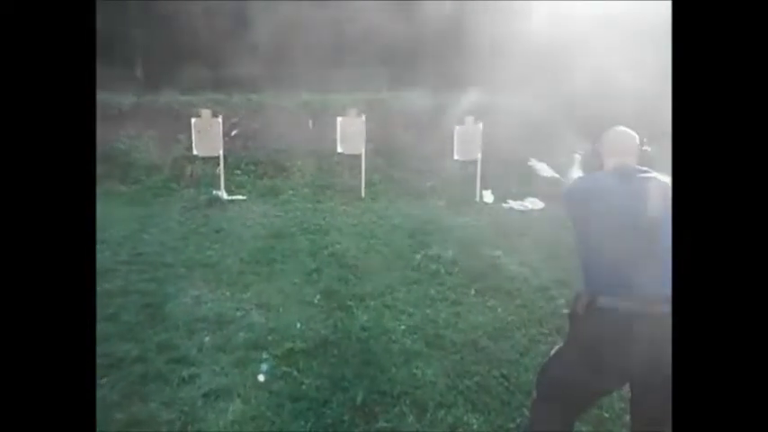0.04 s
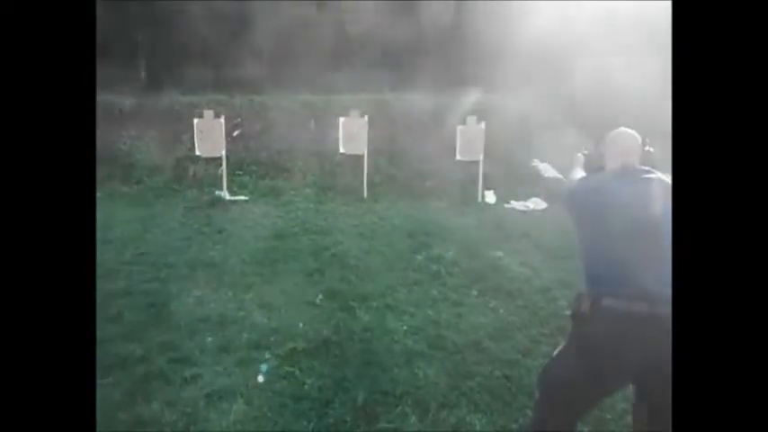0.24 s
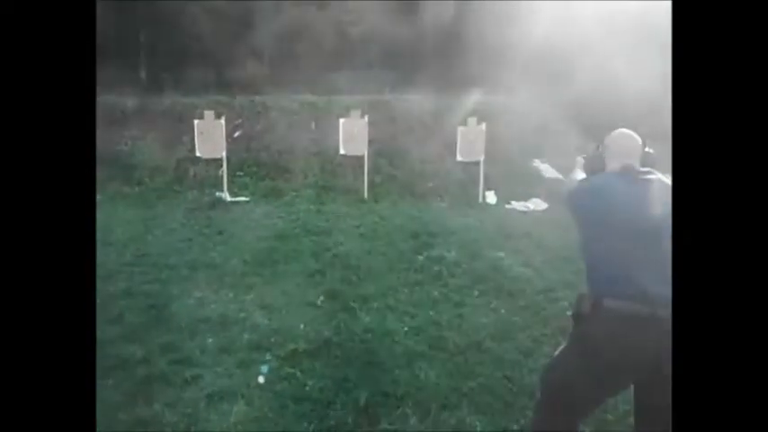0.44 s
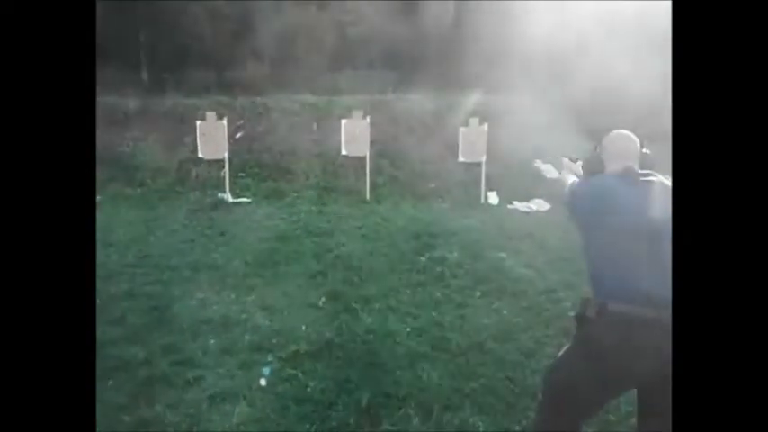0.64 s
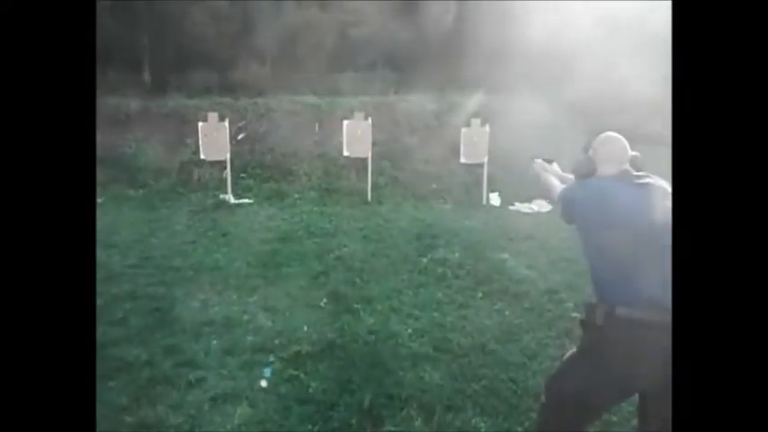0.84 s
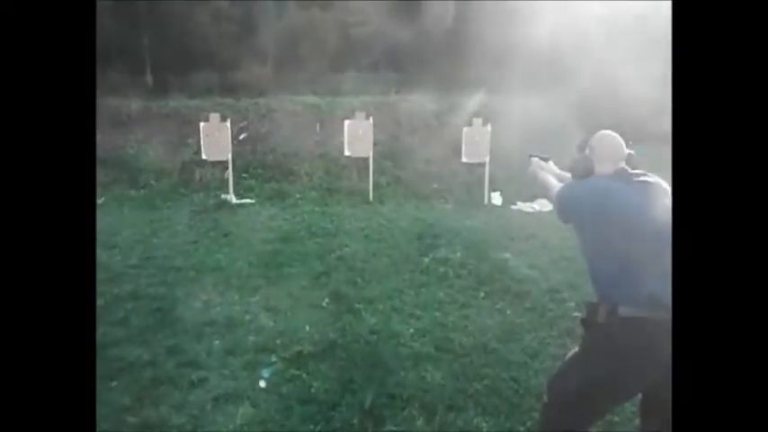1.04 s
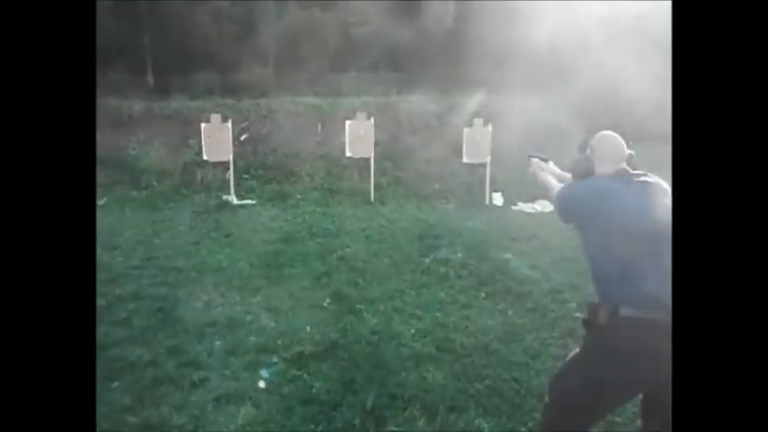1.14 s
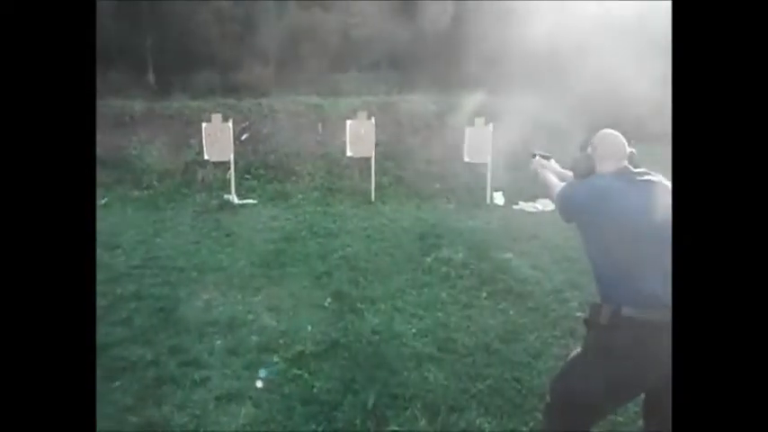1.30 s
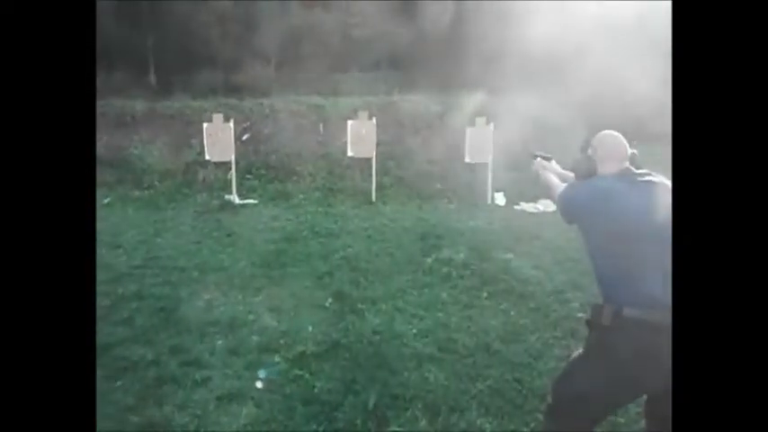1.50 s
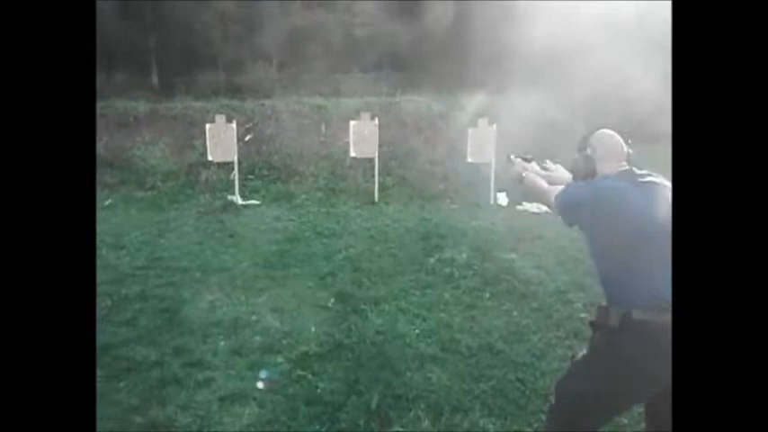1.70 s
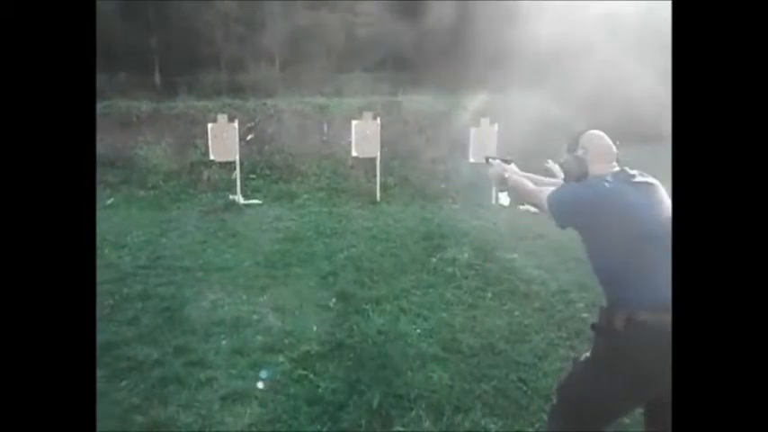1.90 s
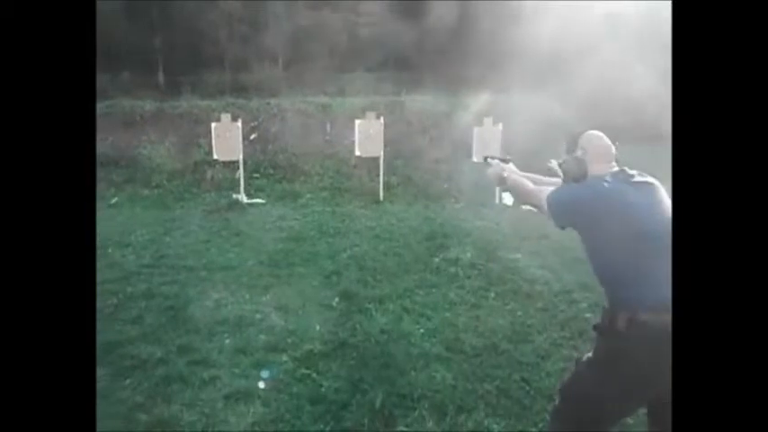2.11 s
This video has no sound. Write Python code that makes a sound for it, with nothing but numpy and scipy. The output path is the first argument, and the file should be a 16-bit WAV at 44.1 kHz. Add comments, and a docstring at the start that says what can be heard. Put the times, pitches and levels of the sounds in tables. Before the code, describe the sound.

Four pistol shots in two quick pairs, close to a small overloading microphone on a grass range; each cracks, slaps back off an earth bank, then fades in fluttering tree echoes over quiet hiss.

```python
"""Pistol shots on a grass range

Two pairs of shots close to a small microphone: a few pressure bumps and a noise burst overload it.
The earth backstop throws back a slap and ragged noise; far banks return dull knocks and one crisp clap.
The field and trees leave fluttering noise tails, over a steady outdoor hiss."""
import sys
import numpy as np
from scipy import signal
from scipy.fft import rfft, irfft, next_fast_len
from scipy.io import wavfile
from scipy.ndimage import uniform_filter1d

SR = 44100
rng = np.random.default_rng(int(sys.argv[2]) if len(sys.argv) > 2 else 0)


def master(y):
    """Save y as 16-bit WAV."""
    cut = np.clip(np.atleast_2d(y).T, -1, 1)
    pcm = np.round(cut * 32767)  # scale
    wavfile.write(sys.argv[1], SR, pcm.astype(np.int16))


N = 94815
T = np.arange(N) / SR  # s

# The shots, with the level of each part ahead of the microphone overload:
# start_s, blast_db, backstop_db, backstop_hold_s, return_wave_db, ring_db, knocks_db, clap_and_tail_db
SHOTS = [(0.2184, 11, 0, 0.025, -14, -7, 1, 4), (0.5762, 9, -0.5, 0.013, -8.5, -5, -4.5, -1),
         (1.2754, 5, -8.5, 0.016, 3, -13.5, -11.5, -10.5), (1.6149, 1.5, -17, 0.015, -5, -20, -20.5, -15)]

# Noise colours, as relative density; noise() sets the overall level: pitch_hz, level_db
BLAST_COLOUR = [(60, -9), (180, -19.5), (350, -9), (600, -17), (1500, -22), (2600, -18.5), (3700, -16),
                (4500, -2), (4950, -15), (5500, -24.5), (6300, -25.5), (7200, -73)]
BACKSTOP_COLOUR = [(60, -8), (300, -13.5), (480, -14), (620, 5.5), (820, -15), (1500, -8.5), (2800, 4),
                   (3600, 2.5), (4600, 7.5), (5050, 6), (5500, -39), (6200, -4), (7200, -43)]
KNOCK_PUFF_COLOUR = [(60, -22), (200, -5), (420, 0), (650, 0), (900, -7), (2000, -28)]
CLAP_COLOUR = [(200, -22), (900, -14), (1600, -7), (2100, -8), (3000, -2), (4500, 0), (5050, -4),
               (5500, -17), (6200, -16), (7200, -45)]
TREES_COLOUR = [(60, -20.5), (180, -21.5), (370, -5.5), (660, -2.5), (850, -15.5), (1500, -16), (2900, -3),
                (3700, -6.5), (4500, 5.5), (5050, -3.5), (5500, -21.5), (6200, -10.5), (7200, -25.5)]
LINGER_COLOUR = [(100, -27), (200, -12), (370, -2), (660, -1.5), (850, -13.5), (1500, -7.5), (2900, -4),
                 (4500, -3), (5500, -32.5), (7000, -45)]
AIR_COLOUR = [(30, 6.5), (100, -7), (330, -6), (600, -1), (900, -10), (2200, -10), (4500, -8.5),
              (5500, -20), (6300, -23), (7200, -59)]

# Bumps of the blast's pressure wave, timed from the shot:
# delay_s, width_s (standard deviation), height (1 = full scale, ahead of the overload)
BLAST_PRESSURE = [(.004, .0007, -6), (.002, .001, -.9), (.0055, .0006, 1.2), (.0072, .0007, -1.5),
                  (.018, .006, .3), (.029, .005, .13)]
# Bumps of the wave that comes back, timed from the backstop's return:
# delay_s, width_s (standard deviation), height (ahead of each shot's return_wave_db)
RETURN_PRESSURE = [(.004, .0016, -1.4), (.018, .008, .27), (.038, .015, .11)]
# Dull knocks from far banks, levels ahead of each shot's knocks_db:
# delay_s (to the peak), width_s (standard deviation), pitch_hz (at the peak), tone_db, puff_db, crackle_db
KNOCKS = [(.0955, .003, 430, -17, -24, -25), (.2035, .003, 330, -35, -27, -24)]

# Delays count from the shot; tail and clap levels are ahead of each shot's clap_and_tail_db
AIR_DB = -47.5
BLAST_RISE_S, BLAST_HOLD_S, BLAST_FALL_DB_PER_S = 0.00023, 0.009, 1090
RING_DELAY_S, RING_WIDTH_S = 0.0225, 0.0045
RING_HZ, RING_RISE_OCTAVES_PER_S = 442.3, 27.45
BACKSTOP_DELAY_S, BACKSTOP_RISE_S, BACKSTOP_FALL_DB_PER_S = 0.0342, 0.0006, 650
BACKSTOP_FLUTTER_DB = 2.5
SLAP_DB, SLAP_HOLD_S, SLAP_FALL_DB_PER_S = 7, 0.0032, 3045
LEDGE_DB, LEDGE_DELAY_S, LEDGE_WIDTH_S = 2, 0.0545, 0.002
FIELD_DB, FIELD_DELAY_S, FIELD_RISE_S, FIELD_FALL_DB_PER_S = -27.5, 0.074, 0.0006, 109
TREES_DELAY_S, TREES_RISE_S, TREES_HOLD_S = 0.17, 0.076, 0.05
TREES_DB, TREES_FALL_DB_PER_S = -27, 63
LINGER_DB, LINGER_FALL_DB_PER_S = -38, 20.5
TAIL_FLUTTER_DB = 1.4
KNOCK_FALL_OCTAVES_PER_S = 146.5
CLAP_DB, CLAP_DELAY_S, CLAP_RISE_S, CLAP_FALL_DB_PER_S = -10, 0.2371, 0.0012, 2300
OVERLOAD = 0.88  # ceiling of the soft overload, 1 = full scale
OFFSET_BLOCK_HZ, BAND_HZ, STOPBAND_HZ = 0.45, 6550, 16500
MAKEUP_DB, CLIP_HARDNESS = -0.08, 14


def from_db(db):
    """Decibels to gain."""
    return 10 ** (np.asarray(db) / 20)


def noise(colour):
    """Noise of the given colour, rms 1, all but silent above the last pitch listed."""
    hz, db = np.transpose(colour)
    size = next_fast_len(N, True)
    f = np.maximum(np.arange(size // 2 + 1) * SR / size, 1)
    gain = from_db(np.interp(np.log(f), np.log(hz), db, right=-120))
    x = irfft(rfft(rng.standard_normal(size)) * gain, size)[:N]
    return x / x.std()


def flutter(depth_db, size=300):
    """A gain that wavers within milliseconds: random dB, rms depth_db, smoothed twice over size samples."""
    x = uniform_filter1d(uniform_filter1d(rng.standard_normal(N), size), size)
    return from_db(depth_db * x / x.std())


def envelope(delay, rise, hold, fall_db_per_s):
    """Straight rise, hold, then a steady fall in dB."""
    t = T - delay
    fall_db = -fall_db_per_s * np.maximum(t - rise - hold, 0)
    return np.clip(t / rise, 0, 1) * from_db(fall_db)


def lobe(delay, width):
    """A smooth Gaussian bump of height 1."""
    return np.exp(-0.5 * np.minimum(((T - delay) / width) ** 2, 80))


def chirp(delay, width, hz, octaves_per_s):
    """A few cycles of a gliding tone that passes hz at its peak."""
    pitch = hz * 2 ** np.clip(octaves_per_s * (T - delay), -2, 2)
    return lobe(delay, width) * np.sin(2 * np.pi * np.cumsum(pitch) / SR)


def delayed(x, s):
    """The sound, starting s seconds later."""
    return np.concatenate([np.zeros(int(s * SR)), x])[:N]


def open_air():
    """Quiet outdoor hiss: steady coloured noise."""
    return from_db(AIR_DB) * noise(AIR_COLOUR)


def muzzle_blast(db):
    """A pressure wave, and turbulence as noise coloured by the ringing microphone."""
    wave = sum(height * lobe(delay, width) for delay, width, height in BLAST_PRESSURE)
    shape = envelope(0, BLAST_RISE_S, BLAST_HOLD_S, BLAST_FALL_DB_PER_S)
    return wave + from_db(db) * noise(BLAST_COLOUR) * shape


def nearby_ring(db):
    """A short hollow ring just after the blast, rising in pitch."""
    return from_db(db) * chirp(RING_DELAY_S, RING_WIDTH_S, RING_HZ, RING_RISE_OCTAVES_PER_S)


def backstop(ragged, db, hold, wave_db):
    """A hard slap, then ragged scatter from the earth and one ledge, with the returning pressure wave."""
    grain = ragged * noise(BACKSTOP_COLOUR)
    slap = from_db(SLAP_DB) * envelope(BACKSTOP_DELAY_S, BACKSTOP_RISE_S, SLAP_HOLD_S, SLAP_FALL_DB_PER_S)
    earth = envelope(BACKSTOP_DELAY_S, BACKSTOP_RISE_S, hold, BACKSTOP_FALL_DB_PER_S)
    ledge = from_db(LEDGE_DB) * lobe(LEDGE_DELAY_S, LEDGE_WIDTH_S)
    scatter = from_db(db) * np.hypot(earth, ledge)
    wave = sum(height * lobe(BACKSTOP_DELAY_S + delay, width) for delay, width, height in RETURN_PRESSURE)
    # hypot adds the parts as powers
    return grain * np.hypot(slap, scatter) + from_db(wave_db) * wave


def field_and_trees(db):
    """Field scatter dies away, then the trees answer with a bright roll and a duller one that lingers."""
    field = from_db(FIELD_DB) * envelope(FIELD_DELAY_S, FIELD_RISE_S, 0, FIELD_FALL_DB_PER_S)
    roll = from_db(TREES_DB) * envelope(TREES_DELAY_S, TREES_RISE_S, TREES_HOLD_S, TREES_FALL_DB_PER_S)
    linger = from_db(LINGER_DB) * envelope(TREES_DELAY_S, TREES_RISE_S, TREES_HOLD_S, LINGER_FALL_DB_PER_S)
    bright = noise(TREES_COLOUR) * np.hypot(field, roll)
    dull = noise(LINGER_COLOUR) * linger
    return from_db(db) * flutter(TAIL_FLUTTER_DB) * (bright + dull)


def far_knocks(db):
    """Dull echoes from far banks: a falling tone, a puff and a little crackle."""
    puff, crackle = noise(KNOCK_PUFF_COLOUR), noise(CLAP_COLOUR)
    knocks = np.zeros(N)
    for delay, width, hz, tone_db, puff_db, crackle_db in KNOCKS:
        grain = from_db(puff_db) * puff + from_db(crackle_db) * crackle
        tone = from_db(tone_db) * chirp(delay, width, hz, -KNOCK_FALL_OCTAVES_PER_S)
        knocks += lobe(delay, width) * grain + tone
    return from_db(db) * knocks


def far_clap(db):
    """One crisp echo from a hard, distant face: a brief noise burst."""
    shape = envelope(CLAP_DELAY_S, CLAP_RISE_S, 0, CLAP_FALL_DB_PER_S)
    return from_db(db + CLAP_DB) * noise(CLAP_COLOUR) * shape


def scene():
    """The four shots with their echoes, over the open air."""
    out = open_air()
    ragged = flutter(BACKSTOP_FLUTTER_DB, size=100)  # the same waver for every shot
    for start, blast_db, backstop_db, hold, wave_db, ring_db, knocks_db, far_db in SHOTS:
        near = muzzle_blast(blast_db) + nearby_ring(ring_db)
        near = near + backstop(ragged, backstop_db, hold, wave_db)
        far = field_and_trees(far_db) + far_knocks(knocks_db) + far_clap(far_db)
        out = out + delayed(near + far, start)
    return out[None]


def record(dry):
    """The input overloads and sheds its offset; a narrow band is kept, and its overshoots clip at full scale."""
    x = OVERLOAD * np.tanh(dry / OVERLOAD)
    offset_block = signal.butter(1, OFFSET_BLOCK_HZ, "high", fs=SR, output="sos")
    x = signal.sosfilt(offset_block, x)
    band = signal.butter(12, BAND_HZ, fs=SR, output="sos")
    x = signal.sosfiltfilt(band, x) * from_db(MAKEUP_DB)
    x = x / (1 + np.abs(x) ** CLIP_HARDNESS) ** (1 / CLIP_HARDNESS)
    # remove the highest treble that clipping adds
    top_cut = signal.cheby2(16, 50, STOPBAND_HZ, fs=SR, output="sos")
    return signal.sosfiltfilt(top_cut, x)


dry = scene()
out = record(dry)
master(out)
```